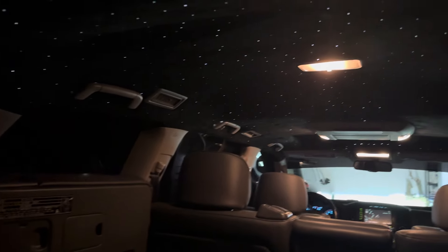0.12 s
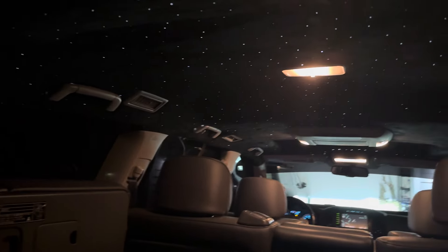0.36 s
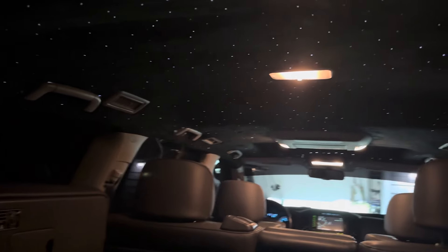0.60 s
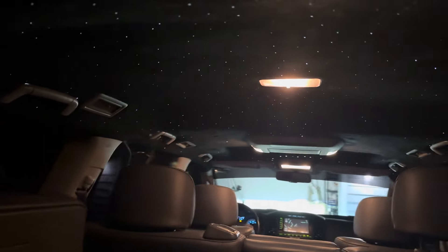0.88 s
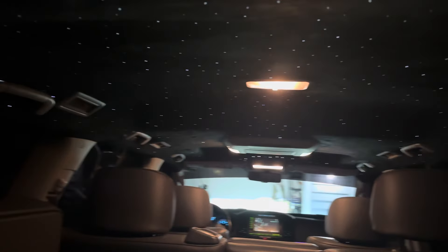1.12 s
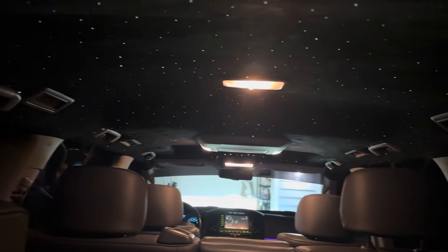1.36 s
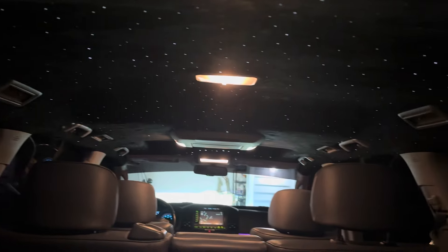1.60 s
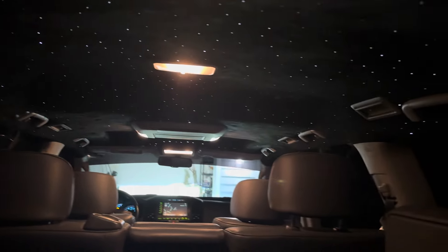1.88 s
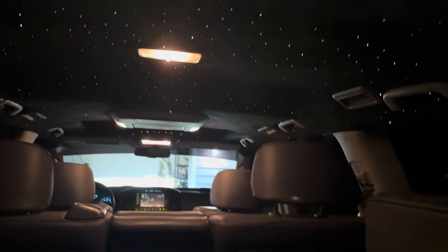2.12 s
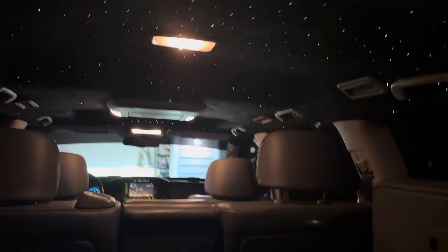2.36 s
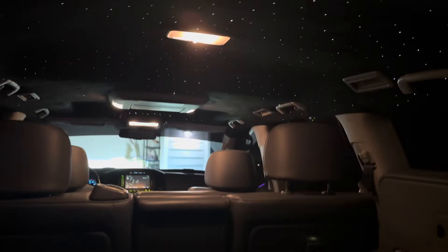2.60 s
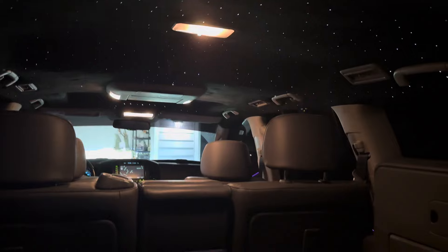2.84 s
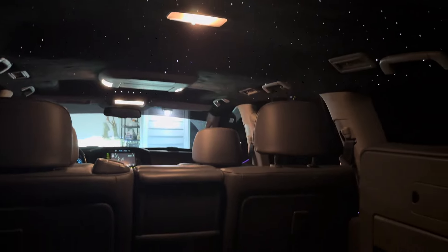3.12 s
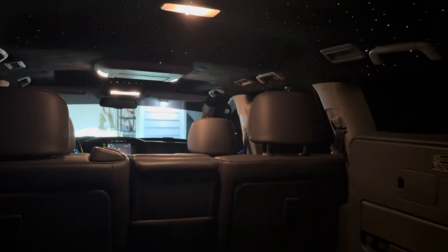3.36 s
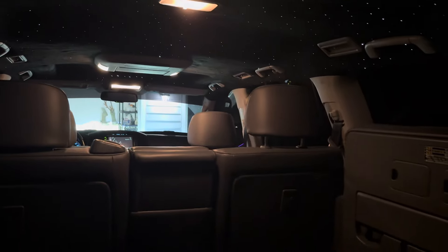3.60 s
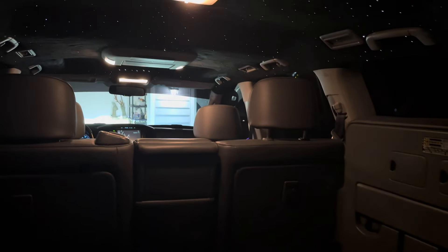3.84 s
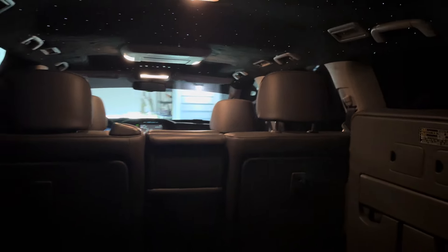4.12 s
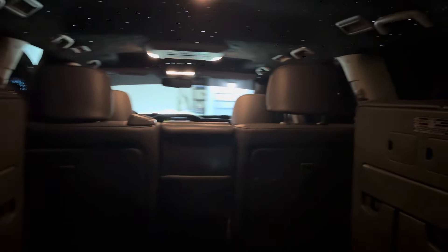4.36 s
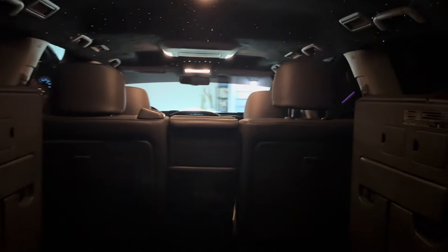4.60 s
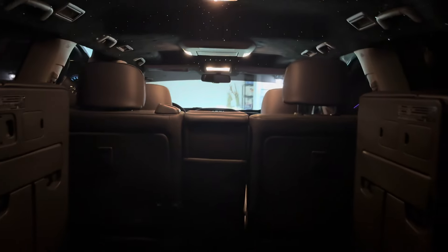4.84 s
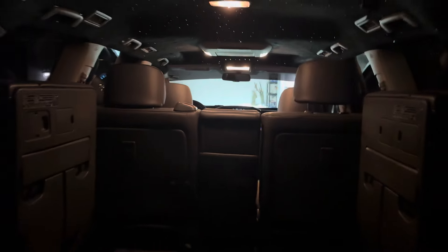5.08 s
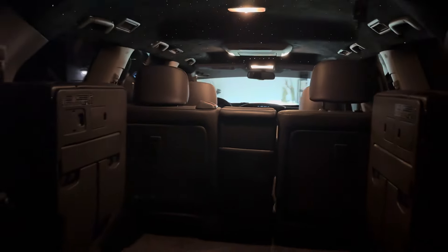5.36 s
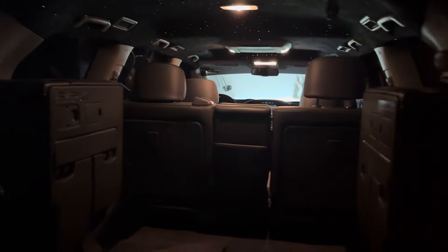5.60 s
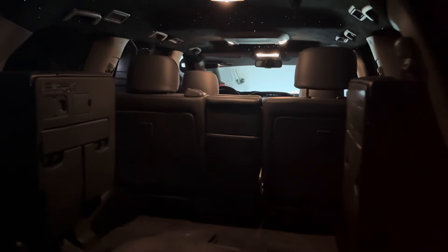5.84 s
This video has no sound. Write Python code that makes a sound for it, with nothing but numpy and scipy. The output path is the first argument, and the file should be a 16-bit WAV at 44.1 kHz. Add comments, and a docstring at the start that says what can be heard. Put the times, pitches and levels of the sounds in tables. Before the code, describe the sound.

A large vehicle idles with a deep hum, speeds up slightly, then booms and roars louder before gritty footsteps and small panel knocks.

```python
"""A large vehicle idles with its tailgate open; a hand-held stereo microphone backs out of the cabin.
A low firing tone (sine and octave) hums in resonant exhaust and fan noise, a little open at the start and closed
by 1 s, with faint squeaks and shuffles. Near 2 s the tone steps up in speed; its octave beats against a swelling
cabin boom (narrow-band noise), and the roar grows as the sound opens. From about 4.9 s feet scrape on gritty ground
(friction noise), small stones click (impulses, short rings); near the end something knocks on a panel (struck modes)."""
import sys
import numpy as np
from scipy import signal
from scipy.fft import next_fast_len
from scipy.io import wavfile

SR = 44100
rng = np.random.default_rng(int(sys.argv[2]) if len(sys.argv) > 2 else 0)


def dump(signal):
    """Clip the signal to [-1, 1] and save it as 16-bit WAV at the path in sys.argv[1]."""
    limited = np.clip(np.atleast_2d(signal).T, -1, 1)
    pcm = np.round(limited * 32767).astype(np.int16)
    wavfile.write(sys.argv[1], SR, pcm)


def ratio_of_db(decibels):
    """Turn decibels (scalar or array-like) into linear amplitude factors; 0 dB maps to 1."""
    return 10 ** (np.asarray(decibels, float) / 20)


N = 263277

# openness of the sound, a little open at the start, closed by 1 s, then opening: (time [s], openness [0-1])
OPENNESS = [(0, 0.2), (1.0, 0.01), (2.0, 0.05), (2.6, 0.09), (3.0, 0.25), (3.5, 0.41), (4.2, 0.43),
            (4.6, 0.72), (5.2, 0.79), (5.5, 0.83), (5.97, 0.81)]
# grit clicks: (time [s], relative level [dB], pitch of the stone [Hz], relative level of the skid after it [dB])
CLICKS = [(4.875, -51, 5000, -78), (4.886, -56, 4500, -76), (4.938, -48, 5000, -68),
          (4.943, -49, 4700, -78), (4.970, -51, 2902, -84), (5.004, -45.5, 5000, -60),
          (5.015, -52, 6500, -81), (5.046, -60, 4804, -86), (5.1845, -45, 12950, -70),
          (5.2229, -35, 6900, -56), (5.231, -54, 5500, -80), (5.2915, -41.5, 7200, -75),
          (5.2927, -49.5, 2700, -75), (5.3216, -41, 7200, -58.5), (5.324, -49.5, 3050, -76),
          (5.341, -51, 2968, -72), (5.574, -51, 3560, -71), (5.5757, -57, 6000, -74),
          (5.589, -50, 3100, -79), (5.835, -49.5, 7000, -80)]
# how a scuff or click reaches the two channels:
# (low edge [Hz], high edge [Hz], left over right [dB], shared power [0-1], lag of the right [s])
FOOT_BANDS = [(700, 2000, 1, .1, .00032), (2000, 4000, 4, .2, .0004), (4000, 8000, 9, .2, .00045),
              (8000, 11000, 0, .1, .00018), (11000, 15700, 0, .6, 0)]
BOUNCE_S, BOUNCE_LOSS_DB, SKID_S = 0.0068, 10, 0.0081   # each stone lands twice, then skids


def rms_one(x):
    """Normalization: scale to unit rms."""
    return x / np.sqrt(np.mean(x ** 2) + 1e-20)


def in_time(rows):
    """Linear interpolation: the columns of a curve table at every sample."""
    s, *columns = np.transpose(rows)
    return [np.interp(np.arange(N) / SR, s, c) for c in columns]


def at_hz(points, hz):
    """Logarithmic pitch scale: read a spectrum table on a log-frequency axis."""
    table_hz, values = np.transpose(points)
    return np.interp(np.log(hz), np.log(table_hz), values)


def drift(rate_hz):
    """Low-pass random process: slow wandering of zero mean and spread 1."""
    step = 40   # the wandering is drawn once in this many samples
    r = np.exp(-2 * np.pi * rate_hz * step / SR)
    white = rng.standard_normal(N // step + 2002)
    slow = signal.lfilter([1], [1, -2 * r, r * r], white)[2000:]
    return np.interp(np.arange(N) / step, np.arange(len(slow)), rms_one(slow - slow.mean()))


def resonance(x, hz, width_hz):
    """Damped oscillator: a two-pole band-pass with gain 1 on top."""
    r = np.exp(-np.pi * width_hz / SR)
    top = np.array([1, 0, -1]) * (1 - r * r) / 2
    return signal.lfilter(top, [1, -2 * r * np.cos(2 * np.pi * hz / SR), r * r], x)


def band(x, low_hz, high_hz):
    """Band limitation by a Butterworth band-pass."""
    edges = [low_hz, min(high_hz, SR / 2.2)]
    return signal.sosfilt(signal.butter(2, edges, "band", fs=SR, output="sos"), x)


def sides(db):
    """Interaural level difference: left and right gains for left over right in dB."""
    return ratio_of_db(np.array([[db / 2], [-db / 2]]))


def pair(alike):
    """Partial coherence: two channels of white noise that share a part of their power."""
    noise = rng.standard_normal((3, N))
    return np.sqrt(alike) * noise[0] + np.sqrt(1 - alike) * noise[1:]


def octaves():
    """Logarithmic pitch scale: centre of each foot band, in octaves from the middle one."""
    low, high = np.transpose(FOOT_BANDS)[:2]
    return np.log2(low * high / (low[2] * high[2])) / 2


def stone_brightness(hz):
    """Size scaling: stones of higher pitch tilt the spectrum up (dB per octave)."""
    plain_hz, bright_db = 6030, 4   # pitch without tilt; dB per octave, per octave of pitch
    return bright_db * np.log2(hz / plain_hz)


def squeaks():
    """Frictional oscillation: faint short tones, as of trim rubbing, unsteady in pitch and level."""
    # (time [s], half-length to 1/e [s], mean pitch [Hz], peak level before flutter [dB])
    squeak_rows = [(.252, .02, 4950, -76), (4.365, .032, 1362, -59), (4.398, .013, 1380, -58),
                   (4.494, .012, 1355, -56.5), (5.601, .003, 8900, -58), (5.742, .003, 8800, -66)]
    t = np.arange(N) / SR
    wobble = 1 + .02 * drift(25.0)
    flutter = ratio_of_db(2.5 * drift(30.0))
    turns = 2 * np.pi * np.cumsum(wobble) / SR
    out = np.zeros(N)
    for s, length, hz, db in squeak_rows:
        out += ratio_of_db(db) * np.exp(-((t - s) / length) ** 4) * np.sin(hz * turns)
    return flutter * out


def knocks():
    """Modal excitation: each blow strikes every panel mode, its strength varied by channel, signs alternating."""
    # dull knocks: (time [s], relative level [dB], extra weight in the bass [dB per octave])
    blow_rows = [(5.5765, -44, 1), (5.584, -48, 1), (5.589, -43.5, 0), (5.603, -47, 0), (5.608, -47, 1),
                 (5.827, -45, -1), (5.836, -36.5, 0), (5.843, -46, 3), (5.853, -48, 1)]
    # modes of a hollow panel: (frequency [Hz], relative level [dB], time to fall 60 dB [s])
    modes = [(330, -3, .05), (430, -5, .045), (640, -5, .04), (850, -1, .035), (1080, 0, .028),
             (1480, 2, .025), (1850, -3, .018), (2500, -9, .012), (3100, -9, .014), (4000, -10, .011),
             (5400, -15, .008)]
    s, db, bass = np.transpose(blow_rows)
    out = np.zeros((2, N))
    chance = rng.standard_normal((len(s), len(modes), 2))
    for k, (hz, mode_db, t60) in enumerate(modes):
        strength = ratio_of_db(db + mode_db - 3 - bass * np.log2(hz / 1200))
        blows = np.full((2, N), 1e-18)
        blows[:, (s * SR).astype(int)] = strength * (1 + .35 * chance[:, k].T)
        r, w = ratio_of_db(-60 / (t60 * SR)), 2 * np.pi * hz / SR
        ring = signal.lfilter([0, np.sin(w)], [1, -2 * r * np.cos(w), r * r], blows)
        out += ring * (-1) ** k
    return out


def shuffles():
    """Granular friction: noise for soft shuffles and each click's skid, which rises, holds and dies away."""
    # shoe and cloth: (time [s], nominal length [s], relative level [dB], brightness [dB per octave])
    shuffle_rows = [(0.24, 0.024, -85, 3), (0.594, 0.022, -81.5, -8.5), (1.284, 0.096, -84.5, -6),
                    (1.888, 0.06, -81.5, -7), (2.1, 0.075, -75.5, -5.5), (2.255, 0.037, -80, -3),
                    (2.45, 0.077, -81, -5), (2.64, 0.063, -74.5, -5), (2.768, 0.036, -79.5, -7),
                    (2.856, 0.051, -73.5, -2.5), (3.19, 0.03, -85.5, -9), (3.516, 0.036, -79, -6.5),
                    (3.963, 0.025, -76, -4), (4.027, 0.033, -78, -6), (4.483, 0.11, -77, 1.5),
                    (4.77, 0.02, -81, 7), (5.182, 0.32, -70, -3.5), (5.598, 0.023, -81, -10),
                    (5.604, 0.025, -80, 15), (5.732, .015, -71, 6), (5.833, 0.015, -68.5, 0)]
    # one for each of FOOT_BANDS: (relative level [dB])
    colour_db = [-1.5, -3, -2, -12.5, -12]
    rise_share, hold_share, fall_share = 0.63, 0.94, 0.88   # of the nominal length
    t = np.arange(N) / SR
    grain_db = 3 * np.minimum(rng.exponential(1, N), 4)
    grain = ratio_of_db(grain_db + 1.5 * drift(150.0) + 1.5 * drift(30.0))
    parts = []
    for (low, high, pan_db, alike, _), db in zip(FOOT_BANDS, colour_db):
        noise = np.roll(grain, rng.integers(N)) * pair(alike)
        parts.append(rms_one(band(noise, low, high)) * sides(pan_db) * ratio_of_db(db))
    parts = np.array(parts)
    rubs = [(s, rise_share * length, hold_share * length, fall_share * length, db, bright)
            for s, length, db, bright in shuffle_rows]
    rubs += [(s + BOUNCE_S, BOUNCE_S / 2, 0, SKID_S, skid_db, stone_brightness(hz))
             for s, _, hz, skid_db in CLICKS]
    out = np.zeros((2, N))
    for s, rise, hold, fall, db, bright in rubs:
        part = slice(max(int((s - 3 * rise) * SR), 0), int((s + hold + 7 * fall) * SR))
        late = t[part] - s
        dying = np.exp(-np.maximum(late - hold, 0) / fall)
        shape = np.where(late < 0, np.exp(-(late / rise) ** 2), dying)
        tilt = ratio_of_db(octaves() * bright)
        out[:, part] += ratio_of_db(db) * shape * np.sum(tilt[:, None, None] * parts[:, :, part], axis=0)
    return out


def scrape():
    """Friction-driven resonance: one hard scrape starts bright and sinks as lower resonances swell in later."""
    # (centre [Hz], width [Hz], relative level [dB], time until full [s], hold [s], fall to 1/e [s])
    bands = [(13500, 4900, 2, .005, 0.04, .016), (10100, 2300, 1.5, 0.007, 0.06, 0.035),
             (8600, 1200, -2, 0.014, 0.05, 0.035), (6160, 1300, -2, .008, 0.065, 0.042),
             (4700, 1100, -1.5, .025, 0.044, .03), (2850, 600, -3, .055, .025, .015)]
    start_s, scrape_db, rough_db = 4.889, -62, 2
    late, out = np.arange(SR // 3) / SR, np.zeros((2, N))
    start = int(start_s * SR)
    part = slice(start, start + len(late))
    together = drift(60.0)
    for hz, width, db, rise, hold, fall in bands:
        rough = ratio_of_db(rough_db * (together + drift(90.0)))
        ringing = resonance(resonance(rough * pair(0.28), hz, width), hz, 2 * width)
        noise = rms_one(ringing)[:, part]
        shape = np.minimum(late / rise, 1) * np.exp(-np.maximum(late - rise - hold, 0) / fall)
        out[:, part] += ratio_of_db(scrape_db + db) * shape * noise * sides(6.0 * (2000 < hz < 8000))
    return out


def stone_rings():
    """Free vibration: each stone rings at its own pitch and falls 60 dB in a set count of cycles."""
    ring_db, ring_cycles = 0.5, 18
    out, late = np.zeros(N), np.arange(SR // 50) / SR
    for s, db, hz, _ in CLICKS:
        fading = ratio_of_db(db + ring_db - 60 * late * hz / ring_cycles)
        out[int(s * SR):][:len(late)] += fading * np.sin(2 * np.pi * hz * late)
    return out * sides(8.2)


def grit():
    """Impact excitation: each click is a sharp crack and a weaker bounce, with a few milliseconds of rattle."""
    # one for each of FOOT_BANDS: (relative level [dB])
    colour_db = [-5, -5.5, -11, -9, -13]
    s, db, hz, _ = np.transpose(CLICKS)
    out = np.zeros((2, N))
    for k, (low, high, pan_db, alike, lag) in enumerate(FOOT_BANDS):
        density = SR / 2 / (high - low)   # makes up for the share of the spectrum that the band keeps
        clicks = np.full(N, 1e-18)
        clicks[(s * SR).astype(int)] = ratio_of_db(db + colour_db[k] + stone_brightness(hz) * octaves()[k])
        clicks = clicks + ratio_of_db(-BOUNCE_LOSS_DB) * np.roll(clicks, int(BOUNCE_S * SR))
        crack = np.array([clicks, np.roll(clicks, round(lag * SR))]) * density
        fall = np.exp(-1 / ((0.0036 + 3.1 / low) * SR))
        rattle = signal.lfilter([0, 1], [1, -fall], clicks) * pair(alike) * np.sqrt(density)
        out += band(ratio_of_db(4) * crack + ratio_of_db(-9) * rattle, low, high) * sides(pan_db)
    return out


def roar():
    """Turbulent broadband noise: exhaust and fan in third-octave bands, coloured by cabin resonances."""
    # relative spectrum before overall levelling: (frequency [Hz], density [dB per Hz])
    colour = [(25, -38.5), (36, -14), (50, -9), (70, -12.5), (100, -19), (140, -22.5), (190, -26.5),
              (384, -34.5), (695, -40.5), (1150, -42.5), (1900, -48), (3500, -56.5), (9570, -74),
              (11500, -90.5), (16000, -90.5)]
    # left-right likeness: (frequency [Hz], correlation [-1 to 1])
    likeness = [(60, 0.99), (150, 0.91), (380, 0.73), (950, 0.1), (2380, -0.035), (5980, 0.19),
                (15000, -0.99)]
    # four moments: deep inside, still inside as the engine speeds up, under halfway out, near the open end: (time [s])
    moment_s = [0.5, 2.2, 3.8, 5.402]
    # cabin resonances: (centre [Hz], width [Hz], mean added level at each of the four moments [dB])
    peaks = [(104, 35, 1, -7.5, -8, -14), (141.6, 24, -15.5, 6.5, 0.5, -1.5),
             (331, 33, 4, -13, -14.5, -5.5), (403.4, 98, -12.5, 4.5, 3, -6),
             (634, 160, -2.5, -4.5, -15.5, -3.5), (795, 26, -1, -6, 7, -5.5), (887, 75, -0.5, 2, -2, -10),
             (930, 19, -7.5, 1.5, -1, -11.5), (1002, 85, -3.5, 1.5, -11.5, -3),
             (1302, 13, -7.5, -0.5, 5.5, -9), (1340, 61, 3, -0.5, 3, -3), (1650, 43, 0, -0.5, 0, 3),
             (2350, 530, -0.5, -9.5, -3.5, 2.5), (2770, 60, -8.5, 2.5, 3.5, 3.5),
             (3400, 50, -9, -1.5, -1.5, -15), (6570, 1600, -6.5, -4.5, -1.5, -4),
             (9400, 1300, -9.5, -10.5, -1, 9)]
    # small steady cuts and one lift: (centre [Hz], width [Hz], gain [dB])
    steady_colour = [(750, 140, -1.5), (1226, 110, -1), (1475, 51, 1.5), (1960, 220, -1.5)]
    inside_db, gain_db = -51, 8.5                        # gains here are from openness 0 to 1
    bass_gain_db, treble_inside_db, treble_gain_db = 8.5, -3, 2
    top_gain_db, bass_left_db = 15, 1.0                  # high hiss when most open; rumble leans left
    t = np.arange(N) / SR
    [openness] = in_time(OPENNESS)
    out, together = 0, drift(3.0)
    edges = 25 * 2 ** np.arange(0, 9.4, 1 / 3)
    white = rng.standard_normal((2, 2, N))
    for k, (low, high) in enumerate(zip(edges, edges[1:])):
        mid, side = band(white[k % 2], low, high)
        hz = np.sqrt(low * high)
        alike = np.clip(at_hz(likeness, hz), -1, 1)
        bright = np.clip(np.log2(hz / 1500) / 2, 0, 1)      # the open end lets more treble through
        deep = np.exp(-(np.log2(hz / 190) / 0.56) ** 2)      # and the tailpipe's rumble comes closer
        db = at_hz(colour, hz) + bright * (treble_inside_db + treble_gain_db * openness)
        db = db + deep * bass_gain_db * openness + (hz > 11000) * top_gain_db * openness ** 2
        db = db + 1.43 * (0.49 * together + drift(8.8))
        stereo = np.sqrt(1 + alike) * mid + np.sqrt(1 - alike) * side * [[1], [-1]]
        out = out + ratio_of_db(db) * stereo * sides(bass_left_db * (hz < 400))
    out = signal.sosfilt(signal.butter(4, 40, "high", fs=SR, output="sos"), out)
    ringing = 0
    for hz, width, *db in peaks:
        ringing = ringing + ratio_of_db(np.interp(t, moment_s, db) + 1.5 * drift(2.5)) * resonance(out, hz, width)
    out = out + ringing
    for hz, width, db in steady_colour:
        out = out + (ratio_of_db(db) - 1) * resonance(out, hz, width)
    out = out / np.std(band(out, 200, 2500))
    return ratio_of_db(inside_db + gain_db * openness) * out


def boom():
    """Room mode: narrow-band noise of one cabin air mode, evened so that it swells with its set level."""
    # swells added to the steadier boom: (time of the peak [s], level [dB])
    swells = [(2.15, -48), (2.451, -41.5), (3.15, -44.5), (4.0, -38), (4.551, -47), (4.85, -41.5),
              (5.3, -48), (5.6, -42)]
    mode_hz, width_hz = 115.94, 6.5
    inside_db, gain_db, swell_s = -53.5, 11, 0.22   # level between swells; half-length of a swell to 1/e
    t = np.arange(N) / SR
    [openness] = in_time(OPENNESS)
    noise = resonance(rng.standard_normal(N), mode_hz, width_hz)
    noise = resonance(noise, mode_hz, width_hz)
    envelope = np.abs(signal.hilbert(noise, next_fast_len(N))[:N])
    evened = noise / (envelope + 0.39 * noise.std()) ** 0.89
    level = ratio_of_db(inside_db + gain_db * openness)
    for s, db in swells:
        level = level + ratio_of_db(db) * np.exp(-((t - s) / swell_s) ** 2)
    return level * rms_one(evened) * sides(0.44)


def firing_tone():
    """Periodic excitation and beats: a sine at the firing rate and its octave, each wavering a little."""
    # engine: (time [s], mean firing rate [Hz], firing tone rms before wavering [dB])
    engine = [(0, 47, -33), (.7, 47.05, -32), (1.45, 46.82, -32), (1.65, 46.6, -35.5), (1.9, 47.7, -29),
              (2.1, 50.8, -26), (2.3, 52.3, -25.5), (2.75, 53.17, -26), (3.3, 53.64, -26.5),
              (3.9, 53.92, -28.5), (4.6, 54.76, -29.5), (5.97, 55.7, -30.5)]
    octave_inside_db, octave_gain_db = -47.5, 9.5   # the octave grows with openness
    (hz, tone_db), [openness] = in_time(engine), in_time(OPENNESS)
    phase = 2 * np.pi * np.cumsum(hz + 0.17 * drift(3.7)) / SR
    tone = ratio_of_db(tone_db + 0.9 * drift(12.0)) * np.sin(phase)
    octave_level = ratio_of_db(octave_inside_db + octave_gain_db * openness + 3 * drift(3))
    octave = octave_level * np.sin(2 * phase - 1.0 + .6 * drift(2))
    return np.sqrt(2) * (tone + octave) * sides(0.47)


def scene():
    """Superposition: small cabin sounds, feet and stones, roar, boom and engine add linearly."""
    small = squeaks() + knocks()
    feet = shuffles() + scrape() + stone_rings() + grit()
    return small + feet + roar() + boom() + firing_tone()


def low_pass(x):
    """Removes everything above the highest recorded frequency."""
    return signal.sosfilt(signal.butter(12, 16220, fs=SR, output="sos"), x)


def record(dry):
    """Linear filtering: a fixed treble colour, then a low-pass that cuts the top."""
    # small lifts at 5.5, 7 and 9.5 kHz, a cut at 11.2 kHz: (centre [Hz], width [Hz], gain [dB])
    treble_colour = [(5500, 640, 1.5), (7000, 500, 1.5), (9500, 1100, 3), (11200, 800, -7)]
    for hz, width, db in treble_colour:
        dry = dry + (ratio_of_db(db) - 1) * resonance(dry, hz, width)
    stop_hz = 15900 * 1.02   # 50 dB down from here
    mix = signal.sosfilt(signal.cheby2(10, 50, stop_hz, fs=SR, output="sos"), dry)
    return low_pass(mix)


dry = scene()
out = record(dry)
dump(out)
```